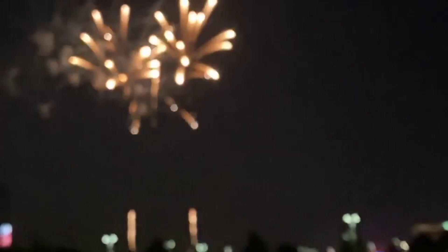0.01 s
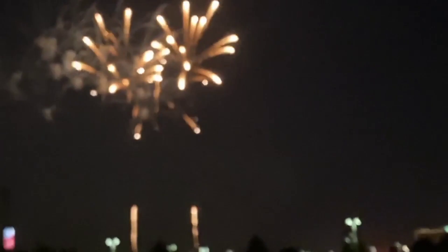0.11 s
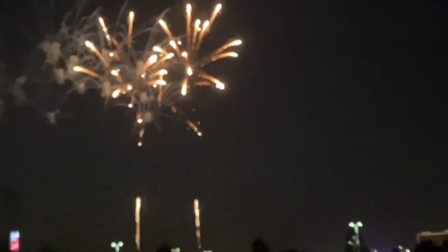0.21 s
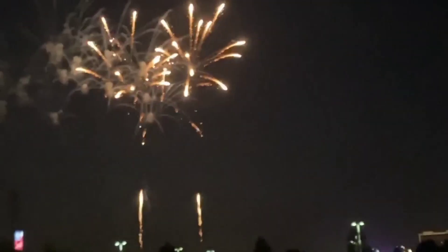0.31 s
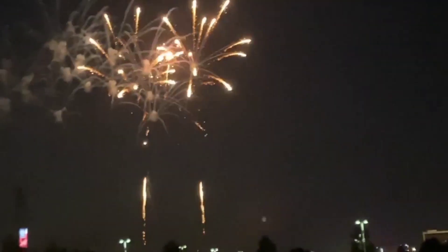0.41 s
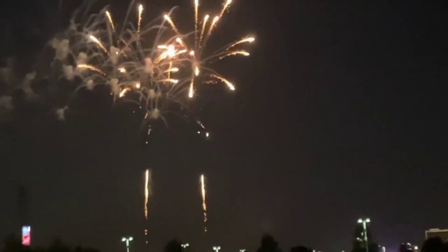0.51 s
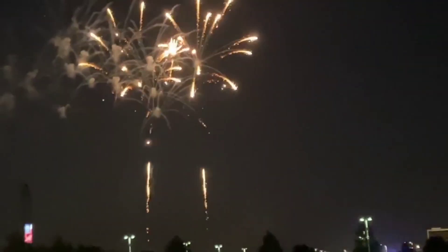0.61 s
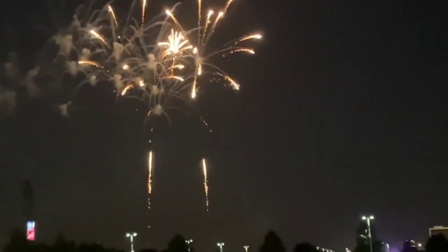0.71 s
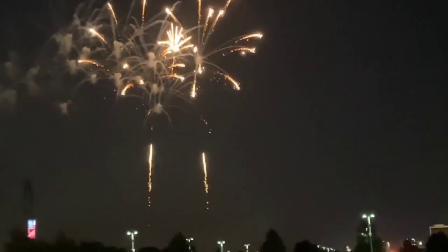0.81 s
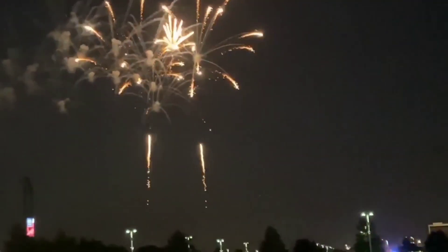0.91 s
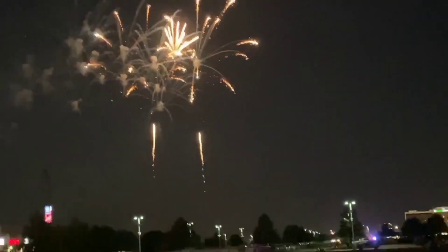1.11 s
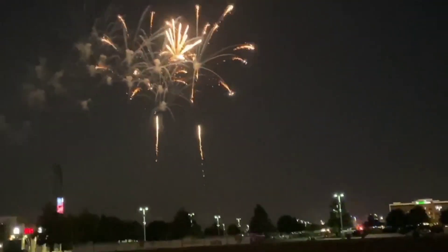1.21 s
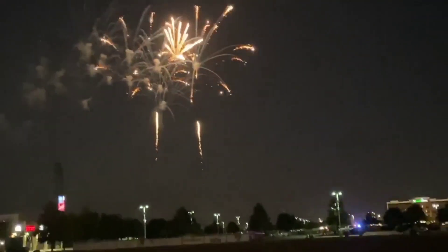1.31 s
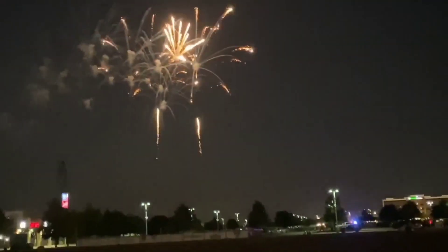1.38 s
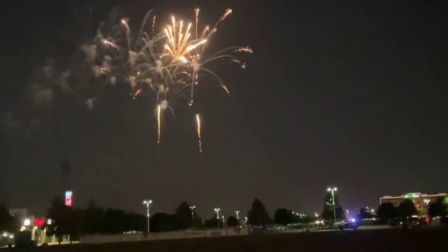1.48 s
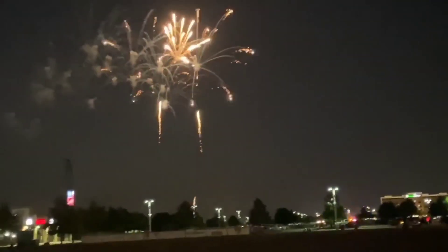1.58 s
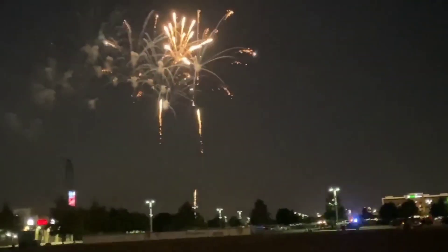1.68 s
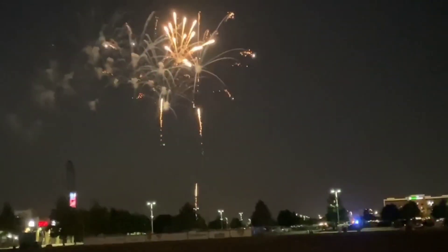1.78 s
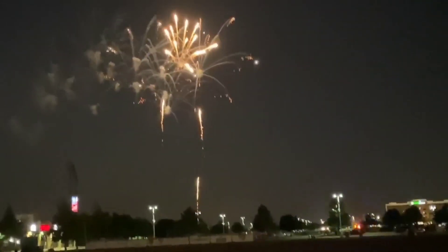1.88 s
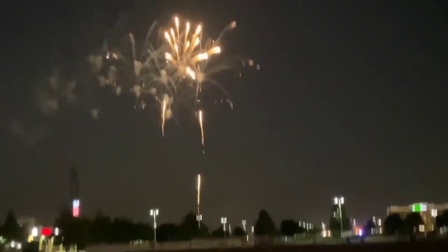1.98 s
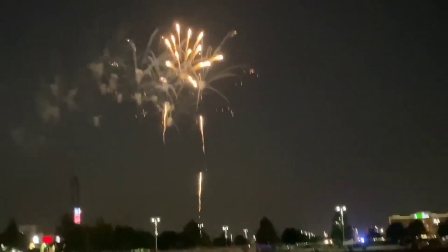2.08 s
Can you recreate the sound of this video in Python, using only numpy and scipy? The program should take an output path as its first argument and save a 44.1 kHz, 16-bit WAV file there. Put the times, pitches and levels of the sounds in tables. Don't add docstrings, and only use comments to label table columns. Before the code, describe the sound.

Fireworks far off over an open car park at night: two huge cracking blasts close together, rolling echoes, then a cluster of dull booms and faint thuds, over crackling hiss and low rumble, on a phone.

```python
import sys
import numpy as np
from scipy import signal
from scipy.fft import rfft, irfft
from scipy.io import wavfile
from scipy.ndimage import uniform_filter1d

SR = 44100
rng = np.random.default_rng(int(sys.argv[2]) if len(sys.argv) > 2 else 0)


def store_wav(level_fs):
    pcm = np.round(np.clip(np.atleast_2d(level_fs), -1, 1) * 32767)
    wavfile.write(sys.argv[1], SR, pcm.T.astype(np.int16))


def ratio(d):
    e = np.asarray(d, float) / 20
    return 10 ** e


N = 92610
T = np.arange(N) / SR
F = np.maximum(np.fft.rfftfreq(N, 1 / SR), 1.)


def shape(table):
    hz, db = np.array(table).T
    octaves_below = np.maximum(np.log2(hz[0] / F), 0)
    octaves_above = np.maximum(np.log2(F / hz[-1]), 0)
    inside_db = np.interp(np.log(F), np.log(hz), db)
    return ratio(inside_db - 14 * (octaves_below + 3 * octaves_above))


def curve(table):
    s, db = np.array(table).T
    return ratio(np.interp(T, s, db))


def unit(x):
    return x / np.sqrt(np.mean(x ** 2))


def walk(rate):
    hold = int(SR / rate)
    steps = np.repeat(rng.standard_normal(N // hold + 1), hold)
    slewed = uniform_filter1d(uniform_filter1d(steps, hold), hold)
    return unit(slewed[:N])


def ports(x):
    lag_s, lead_rad, lead_hz = .000056, .45, 650
    louder_db, louder_hz = 4.5, 1300
    lead = np.pi * F * lag_s + lead_rad / 2 * np.exp(-np.log(F / lead_hz) ** 2)
    louder = ratio(louder_db / 2 * np.exp(-np.log(F / louder_hz) ** 2))
    tilt = louder * np.exp(1j * lead)
    return irfft(rfft(x) * np.array([tilt, 1 / tilt]), N)


# frequency in Hz, unrelated sound between the ports in dB.
PORT_DIFFERENCE = [(40, -31), (200, -12), (600, -11.5), (1200, -2), (1900, -19), (7500, 6.5), (9000, -39),
                   (10500, -21.5)]


def diffuse(x, other, gain):
    shared = ports(irfft(rfft(x) * gain, N))
    side = irfft(rfft(other) * gain * shape(PORT_DIFFERENCE), N)
    return unit(shared + side * np.array([[1], [-1]]))


# start in seconds, level in dB, boom in Hz, crack over boom in dB, ring of the boom as Q.
SHELLS = [
    (.2118, -1.5, 125.3, -2, 0.85),
    (0.3986, -1.5, 144.2, -5.5, 1.27),
    (1.1134, -9.5, 86, -27.5, 4.9),
    (1.1951, -6.5, 102, -22.5, 2.1),
    (1.2849, -17, 189, -33.5, 6.5),
    (1.656, -26, 145, -37.5, 4.6),
    (1.917, -27, 75.4, -37, 6.3),
    (.886, -28, 118, -36, 2.2),
    (2.04, -28.5, 144, -18, 7.8),
]
# frequency in Hz, level in dB.
CRACK_TONE = [(150, -1.5), (300, -3.5), (700, -7.5), (1500, -20.5), (3000, -27), (5000, -34), (8000, -28.5),
              (12500, -46.5)]


def blasts():
    late_cycles, phase_cycles = 1.15, .83
    lowest_hz, boom_top = 48, 4
    ground_lag_s, ground_db, ground_top_hz = 0.00213, -10, 2500
    dull_below_db, dull_per_khz = -12, .3
    sweep = np.exp(-2j * np.pi * (late_cycles * np.log(F / 1000) + phase_cycles))
    low_cut = 1 / (1 + (lowest_hz / F) ** 4)
    bounce = ratio(ground_db) * np.exp(-2j * np.pi * F * ground_lag_s) / (1 + (F / ground_top_hz) ** 2)
    path = sweep * low_cut * (1 + bounce)
    out = np.zeros(N)
    for s, db, hz, crack_db, q in SHELLS:
        ring = 1 / (1 + 1j * q * (F / hz - hz / F))
        boom = ring / (1 + 1j * F / hz / 2) / (1 + (F / hz / boom_top) ** 4)
        dulling_db = min(crack_db - dull_below_db, 0) * dull_per_khz * F / 1000
        crack = ratio(crack_db + dulling_db) * shape(CRACK_TONE)
        pulse = irfft((boom + crack) * path * np.exp(-2j * np.pi * F * s), N)
        out = out + ratio(db) * pulse / np.abs(pulse).max()
    return ports(out + near_echo(out))


def near_echo(x):
    level_db, t60_s, top_hz = -22, 0.3, 3000
    decay = ratio(level_db - 60 * T / t60_s) * (T > .02)
    tail = rng.standard_normal(N) * decay / np.sqrt(t60_s * SR / 14)
    echo = signal.fftconvolve(x, tail)[:N]
    return irfft(rfft(echo) / (1 + (F / top_hz) ** 2), N)


# peak in seconds, level in dB, fall to -60 dB in seconds, centre
# in Hz.
CASE_SPITS = [
    (0.2142, -12.5, 0.013, 6640),
    (.399, -15.5, .035, 3860),
    (1.116, -16.5, .05, 3500),
    (1.196, -17, .09, 2620),
    (1.275, -20.5, .04, 2740),
    (.533, -26, .06, 2500),
]


def spits():
    rise_s, q = .014, .6
    noise = rng.standard_normal(N)
    out = np.zeros(N)
    for s, db, t60, hz in CASE_SPITS:
        burst = noise * ratio(db - 60 * np.abs(T - s) / np.where(T > s, t60, rise_s))
        band = 1 / (1 + (q * (F / hz - hz / F)) ** 2) ** 2 / (1 + (F / hz / 2) ** 8)
        out = out + irfft(rfft(burst) * band, N)
    return ports(out)


# frequency in Hz, level in dB per Hz.
STAR_TONE = [(150, -31.5), (300, 2.5), (450, 7.5), (1200, 1), (2200, 0.5), (4500, -4), (7000, -11.5),
             (10300, -39.5)]
# time in seconds, level in dB.
STAR_LEVEL = [(.05, -32), (.19, -36), (.23, -38.5), (.29, -42), (.385, -35), (.42, -37.5), (.5, -43.5),
              (.535, -35), (.7, -36), (.88, -34), (1.1, -32), (1.21, -31.5), (1.28, -34), (1.45, -33),
              (1.7, -32.5), (1.9, -33), (2.1, -34)]


def stars():
    crackle_per_s, crackle_db, scatter_db = 600, -7, 2.5
    brighten_db_per_s, brighten_hz = 1.5, 2000
    out, swell = 0, walk(5.22)
    for hz in 180 * 2 ** np.arange(0, 6.1, .5):
        strength = ratio(scatter_db * np.minimum(rng.exponential(size=N), 4))
        clicks = (rng.random((2, N)) < crackle_per_s / SR) * strength
        raw = rng.standard_normal((2, N)) + ratio(crackle_db) * unit(clicks - clicks.mean())
        band = np.exp(-(np.log2(F / hz) / .35) ** 2)
        gather_db = brighten_db_per_s * (T - N / 2 / SR) * np.exp(-np.log(hz / brighten_hz) ** 2)
        flicker_db = .6 * swell + 1.3 * walk(15)
        out = out + irfft(rfft(raw) * band, N) * ratio(gather_db + flicker_db)
    return diffuse(out[0], out[1], shape(STAR_TONE)) * curve(STAR_LEVEL)


# time in seconds, level in dB.
ROLL_LEVEL = [(.05, -42.5), (.45, -33.5), (.6, -32.5), (.72, -31), (.9, -33.5), (1.3, -39.5), (1.5, -43),
              (2.1, -41)]


def roll():
    centre_hz, width_octaves = 173.4, 0.28
    raw = rng.standard_normal((2, N)) * ratio(3 * walk(20))
    band = np.exp(-(np.log2(F / centre_hz) / width_octaves) ** 2)
    return diffuse(raw[0], raw[1], band) * curve(ROLL_LEVEL)


# frequency in Hz, level in dB per Hz.
RUMBLE_TONE = [(25, -15.5), (45, -6.5), (75, 2), (130, 0.5), (200, -9.5), (280, -10), (400, -49.5)]
# time in seconds, level in dB.
RUMBLE_LEVEL = [(0.05, -28.5), (0.11, -30), (0.23, -27), (0.39, -29.5), (0.93, -30), (1.12, -28.5),
                (1.44, -28), (1.6, -34), (1.8, -37), (2.1, -33)]


def rumble():
    raw = rng.standard_normal((2, N)) * ratio(2.4 * walk(14))
    return diffuse(raw[0], raw[1], shape(RUMBLE_TONE)) * curve(RUMBLE_LEVEL)


# time in seconds, level in dB.
INSECT_LEVEL = [(.05, -72), (.2, -69.5), (.28, -79), (.38, -74), (.47, -79), (.55, -74), (.7, -81),
                (1.0, -112), (1.025, -69), (1.1, -83), (1.16, -89), (1.38, -81.5), (1.5, -96), (2.1, -110)]


def insect():
    centre_hz, width_hz = 11000, 800
    raw = rng.standard_normal(N) * ratio(2.5 * walk(43))
    band = np.exp(-((F - centre_hz) / width_hz) ** 4)
    return unit(irfft(rfft(raw) * band, N)) * curve(INSECT_LEVEL)


def scene():
    return blasts() + spits() + stars() + roll() + rumble() + insect()


def gate(x):
    level_db, scatter_db, from_hz = -105, 7, 6300
    f, _, z = signal.stft(x, SR, nperseg=2048)
    power = (np.abs(z[:, :1024]) ** 2).reshape(2, 128, 8, -1).mean(axis=2)
    threshold = ratio(2 * (level_db + scatter_db * rng.standard_normal(power.shape)))
    keep = np.repeat(power > threshold, 8, axis=1) | (f[:1024, None] < from_hz)
    keep = np.pad(keep, ((0, 0), (0, 1), (0, 0)))
    return signal.istft(z * keep, SR, nperseg=2048)[1][:, :N]


def band_limit(x):
    return signal.sosfilt(signal.butter(12, 13300, fs=SR, output="sos"), x)


def record(dry):
    top_hz, start_s = 13000, .0488
    stereo_top_hz, stereo_back_hz, high_side_db, mono_db = 2100, 7600, -11, -70
    x = np.tanh(1.053 * dry) / 0.94
    x = irfft(rfft(x) / (1 + (F / top_hz) ** 24), N)
    low_stereo = 1 / (1 + (F / stereo_top_hz) ** 60)
    high_stereo = ratio(high_side_db) / (1 + (stereo_back_hz / F) ** 60)
    mid = (x[0] + x[1]) / 2
    side = irfft(rfft(x[0] - x[1]) / 2 * (low_stereo + high_stereo + ratio(mono_db)), N)
    mid, side = gate(np.array([mid, side]))
    x = np.array([mid + side, mid - side])
    return band_limit(x * (np.arange(N) > start_s * SR))


dry = scene()
out = record(dry)
store_wav(out)
```